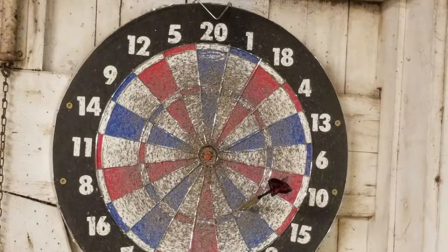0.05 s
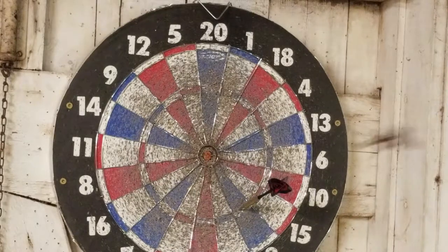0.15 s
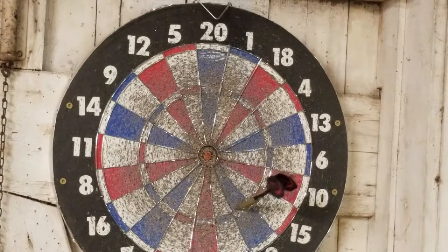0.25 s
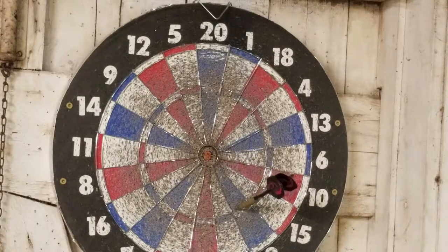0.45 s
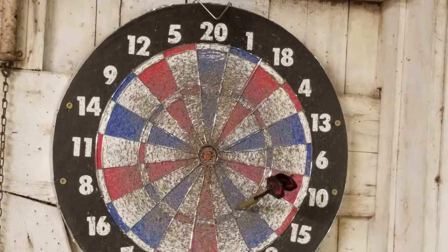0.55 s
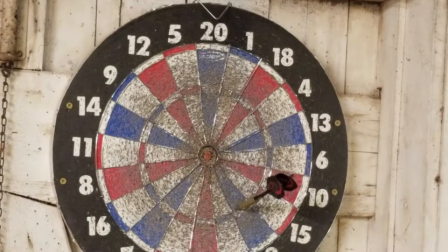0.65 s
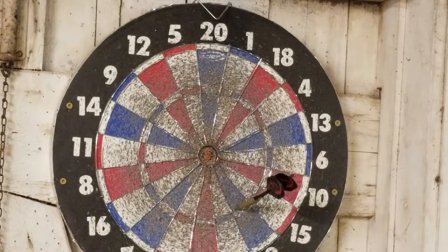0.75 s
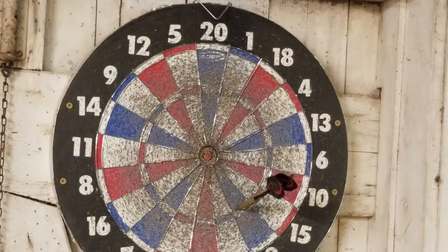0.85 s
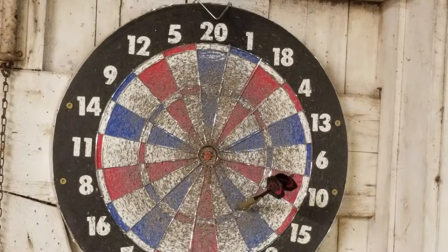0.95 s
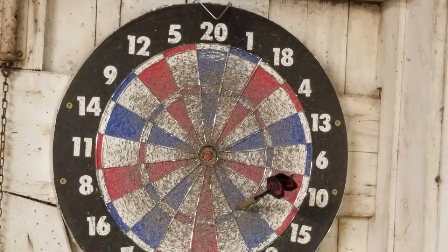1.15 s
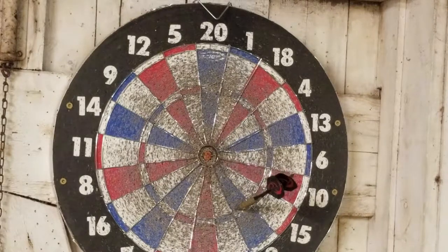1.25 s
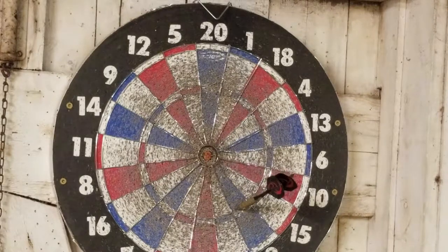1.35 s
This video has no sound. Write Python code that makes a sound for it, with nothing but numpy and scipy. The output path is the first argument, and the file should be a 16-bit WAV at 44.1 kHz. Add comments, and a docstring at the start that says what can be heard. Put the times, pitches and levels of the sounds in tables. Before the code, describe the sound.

A dart hits a dartboard once at about 0.22 seconds: a tiny fibrous crunch, then at 0.23 a hard, hollow wooden thud as the board knocks the plank wall. Thin metallic ringing and short small-room reverberation fade by about 0.6; a very soft settling knock hides near 0.37. Throughout, faint low motor hum beats slowly beneath airy rush and hiss, with barely audible rustles around 0.6 to 0.9.

```python
"""Dart into a board on a plank wall

A steel dart hits a dartboard hung on planks in a small room: noise bursts of snapping fibres,
damped sines for the ringing dart, and a lower set as the board thuds against the planks.
The room answers briefly with decaying noise. Behind it, two motors hum and beat against each other
over a low rush of air, faint hiss, thin unsteady whines and a few soft rustles of filtered noise."""
import sys
import numpy as np
from scipy import signal
from scipy.fft import rfft, irfft
from scipy.io import wavfile

SR = 44100
rng = np.random.default_rng(int(sys.argv[2]) if len(sys.argv) > 2 else 0)


def materialize(psi):
    """Save the field psi as 16-bit PCM at rate SR to the path in sys.argv[1].

    A 1-D psi becomes a single channel; in a 2-D psi each row is a channel.
    """
    bounded = np.clip(np.atleast_2d(psi).T, -1, 1)
    quanta = np.round(bounded * 32767).astype(np.int16)
    wavfile.write(sys.argv[1], SR, quanta)


N = 61739
T = np.arange(N) / SR
HZ = np.maximum(np.arange(N // 2 + 1) * SR / N, 1)  # frequency of each spectrum bin

ENTRY_S, THUD_S = 0.2215, 0.2321  # the point touches; the board meets the wall

# Colour of the background hiss. Each row: frequency in Hz, relative density in dB per Hz.
HISS_COLOUR = [(900, 0.5), (1800, 1.5), (2800, 1), (3600, -6), (4900, -0.5), (6700, -0.5), (8700, -9.5),
               (11500, -1.5), (14300, 0.5), (16000, -3.5)]


def from_db(db):
    """Decibels to gain."""
    return 10 ** (np.asarray(db) / 20)


def rms_one(x):
    """Scale to unit power, all channels together."""
    return x / np.sqrt(np.mean(x ** 2) + 1e-20)


def at_hz(points, hz, axis=1):
    """Read a column of a table on a log-frequency axis."""
    points = np.array(points)
    return np.interp(np.log(hz), np.log(points[:, 0]), points[:, axis])


def colour(x, spectrum):
    """Causal (minimum-phase) filter with the given spectrum."""
    cepstrum = irfft(np.log(from_db(at_hz(spectrum, HZ))), N)
    # Folding the cepstrum onto positive times makes the filter causal.
    cepstrum[1:N // 2] *= 2
    cepstrum[N // 2 + 1:] = 0
    return irfft(rfft(x) * np.exp(rfft(cepstrum)), N)


def stereo(mid, side):
    """Left and right from mid and side."""
    return np.array([mid + side, mid - side])


def pan(x, db):
    """Raise the left channel and lower the right by the same amount."""
    return x * from_db([[db], [-db]])


def diffuse(spectrum):
    """Stereo noise of unit power, alike in the bass and wide in the treble."""
    # Width of the diffuse sound. Each row: frequency in Hz, side minus mid in dB.
    width = [(60, -24), (250, -12), (600, -8), (1200, -2.5), (4000, -4), (14000, -3.5)]
    mid, side = colour(rng.standard_normal((2, N)), spectrum)
    return rms_one(stereo(mid, colour(side, width)))


def ring(modes, start_s):
    """Damped sines set off together, one row for each mode."""
    age = np.maximum(T - start_s, 0)
    tones = [from_db(db - 60 * age / t60) * np.sin(2 * np.pi * hz * age) for hz, db, t60 in modes]
    return np.array(tones)


def crunch():
    """Fibres snap ever harder as the point sinks in, then settle; a few crack loudly."""
    # Colour of the snaps. Each row: frequency in Hz, relative density in dB per Hz.
    fibre_colour = [(150, -23), (500, 8.5), (1200, 0.5), (2000, -6.5), (2900, -13.5), (4200, -11.5),
                    (6500, 1), (9000, -20.5), (12500, -5.5), (16000, -11.5)]
    # The hardest snaps, as the point comes to rest. Each row: start in seconds, level in dB.
    hardest = [(.2286, -22), (0.2314, -18), (0.2380, -22)]
    snaps_per_s, spread_db = 8100, 2
    level_db, start_db, side_db = -23, -6.5, -11.5  # start and side are relative
    rise_s, t60_s, crack_t60_s = 0.0083, 0.01944, 0.008

    hits = rng.random((2, N)) < snaps_per_s / SR
    signs = rng.choice([-1, 1], (2, N))
    snaps = hits * signs * from_db(spread_db * rng.standard_normal((2, N)))

    age = T - ENTRY_S
    rise_db = start_db * np.clip(1 - age / rise_s, 0, 1)
    decay_db = -60 * np.maximum(age - rise_s, 0) / t60_s
    force = (age > 0) * from_db(level_db + rise_db + decay_db)
    cracks = sum((T > s) * from_db(db - 60 * np.abs(T - s) / crack_t60_s) for s, db in hardest)

    mid, side = rms_one(colour(snaps, fibre_colour)) * (force + cracks)
    return stereo(mid, from_db(side_db) * side)


def dart():
    """Point, barrel and shaft ring as damped modes once the board grips the point."""
    # Modes of the dart. Each row: frequency in Hz, relative level in dB, 60 dB decay in seconds.
    dart_modes = [(1013, -15, .38), (1135.6, -8, 0.34), (1185, 4.5, .04), (1269.5, -8.5, 0.39),
                  (1356, -7, 0.24), (1518, -12, 0.25), (1700, -3, 0.13), (2745, -18.5, .3),
                  (3507, -16, 0.42), (3710, -3.5, 0.13), (3880, -16, .31), (3914, 0.5, .13),
                  (4008, 3, 0.041), (3990, -13, 0.36), (4160, -10.5, 0.18), (4570, -16, 0.11),
                  (5090, -12, 0.12), (5120, -19.5, .19), (7070, -11, 0.18)]
    bite_s, rise_s, level_db = 0.2246, 0.0016, -27
    grip = np.clip((T - bite_s) / rise_s, 0, 1)
    return from_db(level_db) * grip * ring(dart_modes, bite_s).sum(axis=0)


def thud():
    """Each contact rings board and planks, low modes building slowest; softness dulls the treble."""
    # Board and planks. Each row: frequency in Hz, relative level in dB, free 60 dB decay in seconds.
    board_modes = [(126.6, -13.5, 0.72), (158.2, 5, 0.11), (204.9, -6.5, 0.35), (218.2, -9, 0.43),
                   (256.8, -7, 0.33), (288.2, -5, 0.35), (345.5, -10.5, 0.33), (377.5, 1, 0.093),
                   (475.8, -12.5, 0.32), (516.5, 0, 0.13), (550.6, -9, 0.19), (586.8, -7, .32),
                   (599, -5.5, 0.19), (627.3, -7, 0.23), (660.4, -10, .31), (699, -18, 0.31),
                   (725, -10.5, 0.3)]
    # The board meets the wall, then settles softly. Each row: delay after first contact in seconds,
    # relative level in dB, contact time in seconds, share of the free ring time.
    knocks = [(0, 1.5, 0.00031, 0.93), (0.134, -23, 0.012, 0.25)]
    level_db, build_cycles, low_cut_hz = -19.5, 0.3, 105

    body = 0
    for delay_s, db, contact_s, ring_share in knocks:
        start_s = THUD_S + delay_s
        modes = [(hz, mode_db, t60 * ring_share) for hz, mode_db, t60 in board_modes]
        cycles = np.array(board_modes)[:, :1] * np.maximum(T - start_s, 0)
        build = 1 - np.exp(-cycles / build_cycles)
        swing = (ring(modes, start_s) * build).sum(axis=0)
        # One-pole low-pass: the longer the contact, the duller the knock.
        soft = np.exp(-4 / (contact_s * SR))
        body = body + from_db(level_db + db) * signal.lfilter([1 - soft], [1, -soft], swing)
    # The deepest air slips round the board.
    low_cut = signal.butter(3, low_cut_hz, "high", fs=SR, output="sos")
    return signal.sosfilt(low_cut, body)


def room():
    """Reflections, uneven in colour, build up during the blow; the bass lingers longest."""
    # Reverberation. Each row: frequency in Hz, relative density in dB per Hz, 60 dB decay in seconds.
    reverberation = [(49.26, -15.5, 0.6), (129, -9, 1), (285, -9.5, 0.49), (656, -4, 0.36),
                     (830, -8.5, .31), (990, -12.5, 0.37), (1400, -13.5, 0.38), (2030, -18.5, .37),
                     (3240, -24, .38), (3540, -18.5, 0.34), (6930, -16.5, .33), (8900, -27.5, .28),
                     (13450, -19.5, .34), (15950, -31.5, 0.25)]
    level_db, build_s = -22.5, 0.013
    ripple_db, ripple_hz = 2.0, 70  # random unevenness and its spacing

    grid = np.arange(0, SR / 2, ripple_hz)
    ripple = from_db(ripple_db * np.interp(HZ, grid, rng.standard_normal(len(grid))))
    field = rfft(diffuse(reverberation)) * ripple
    # Overlapping bands that add up to the whole field, each with its own decay.
    centres = np.geomspace(40, 16000, num=14)
    age = np.maximum(T - THUD_S, 0)
    tail = 0
    for hz, pick in zip(centres, np.eye(len(centres))):
        band = irfft(field * np.interp(np.log(HZ), np.log(centres), pick), N)
        tail = tail + band * from_db(-60 * age / at_hz(reverberation, hz, axis=2))
    build = np.clip((T - ENTRY_S) / build_s, 0, 1) ** 2
    return from_db(level_db) * build * tail


def motors():
    """A motor hums in harmonics; a second runs slightly slower, so their fundamentals beat."""
    # First motor. Each row: multiple of the fundamental, level in dB rms.
    harmonics = [(.5, -76.5), (1, -48), (2, -68), (3, -68), (4, -53.5), (5, -78)]
    hum_hz, beat_hz, second_db = 117.86, 2.11, -52  # second motor in dB rms
    beat_low_s = 0.16  # the fundamentals cancel most here
    turn = 2 * np.pi * hum_hz * T
    first = sum(from_db(db) * np.sin(multiple * turn) for multiple, db in harmonics)
    lag = 2 * np.pi * beat_hz * (T - beat_low_s)
    second = -from_db(second_db) * np.sin(turn - lag)
    return np.sqrt(2) * (first + second)  # rms to peak


def air():
    """Low rush of moving air and a faint, slowly swelling hiss, both coloured noise."""
    # Colour of the rush. Each row: frequency in Hz, relative density in dB per Hz.
    rush_colour = [(25, -12.5), (55, 9.5), (90, -7.5), (210, 4.5), (340, -2), (560, -5), (700, -12.5),
                   (1000, -30.5)]
    # Swell of the hiss. Each row: time in seconds, added level in dB.
    swell = [(0, 3.5), (.15, 0), (.5, 1), (.6, 4), (.7, 2), (.85, 1.5), (1.1, 0), (1.39, 0)]
    rush_db, hiss_db = -56, -69.5
    low_pass = signal.butter(4, 1000, fs=SR, output="sos")
    rush = signal.sosfilt(low_pass, diffuse(rush_colour))
    swell_db = np.interp(T, *np.transpose(swell))
    return from_db(rush_db) * rush + from_db(hiss_db + swell_db) * diffuse(HISS_COLOUR)


def whines():
    """Thin tones made unsteady by a random phase waver, separate in each channel."""
    # Unsteady whines. Each row: frequency in Hz, level in dB rms.
    tones = [(388, -68.5), (1534, -86), (4834, -83), (14282, -80.5)]
    low_pass = signal.butter(2, 59.4, fs=SR, output="sos")  # cutoff of the waver, Hz
    waver = signal.sosfilt(low_pass, rng.standard_normal((len(tones), 2, N)))
    out = 0
    for (hz, db), phase in zip(tones, waver):
        tone = np.sin(2 * np.pi * hz * T + rms_one(phase))
        out = out + from_db(db) * rms_one(tone)
    return out


def rustles():
    """Soft swells of narrow-band noise in the background."""
    # Each row: time of the peak in seconds, length in seconds, centre in Hz, peak level in dB.
    swells = [(0.607, 0.095, 1630, -73), (0.865, 0.065, 1800, -77), (0.824, 0.24, 4730, -76)]
    width_octaves = 0.21
    out = 0
    for s, length_s, hz, db in swells:
        band = np.exp(-.5 * (np.log2(HZ / hz) / width_octaves) ** 2)
        noise = rms_one(irfft(rfft(diffuse(HISS_COLOUR)) * band, N))
        out = out + from_db(db) * np.exp(-2 * ((T - s) / length_s) ** 2) * noise
    return out


def scene():
    """The hit, slightly to the right, over the background."""
    hit = pan(crunch() + dart() + room(), -0.7) + pan(thud(), -0.35)
    background = pan(motors() + whines() + air() + rustles(), -0.15)
    return hit + background


def record(dry):
    """The microphone signal is cut steeply above 16 kHz."""
    top_cut = signal.ellip(10, .1, 80, 16000, fs=SR, output="sos")
    return signal.sosfilt(top_cut, dry)


dry = scene()
out = record(dry)
materialize(out)
```